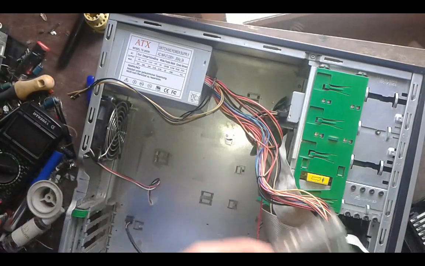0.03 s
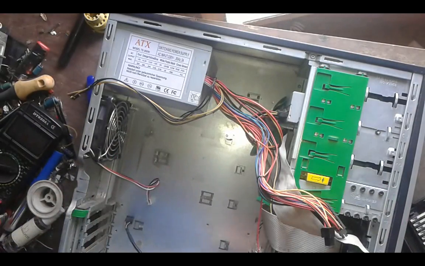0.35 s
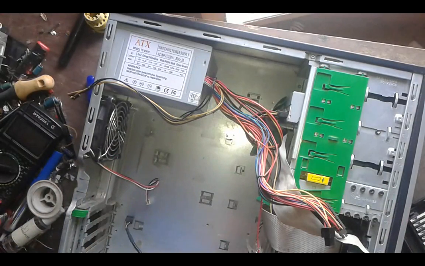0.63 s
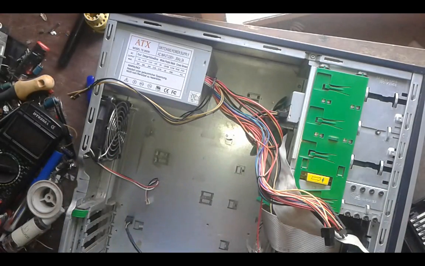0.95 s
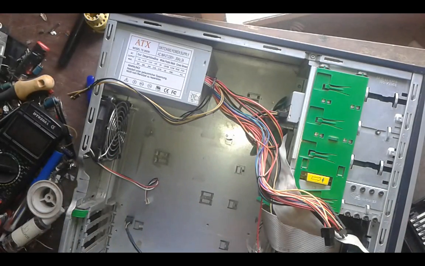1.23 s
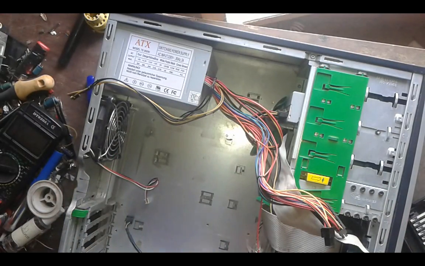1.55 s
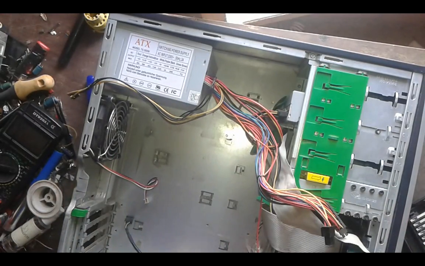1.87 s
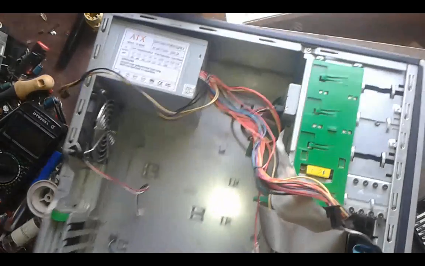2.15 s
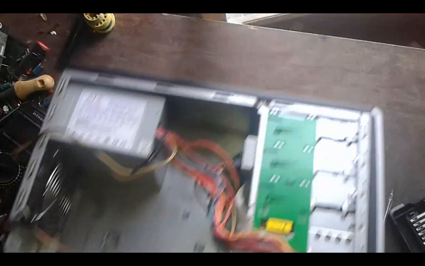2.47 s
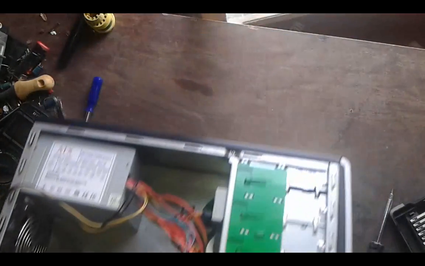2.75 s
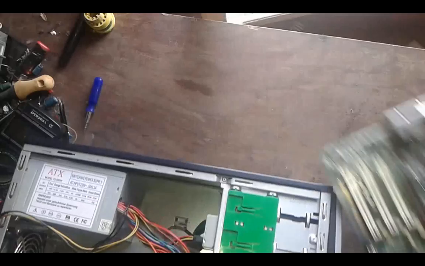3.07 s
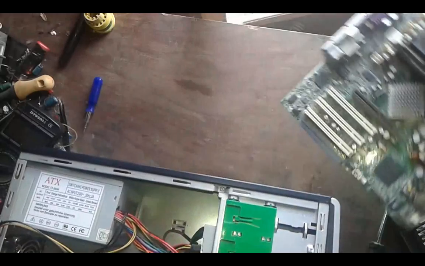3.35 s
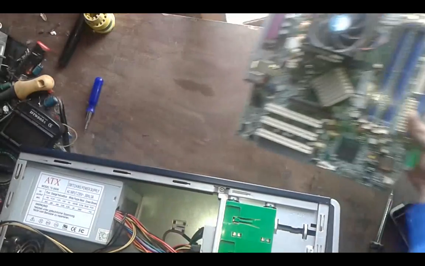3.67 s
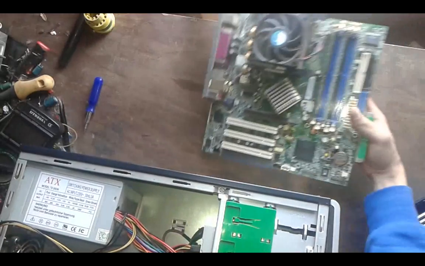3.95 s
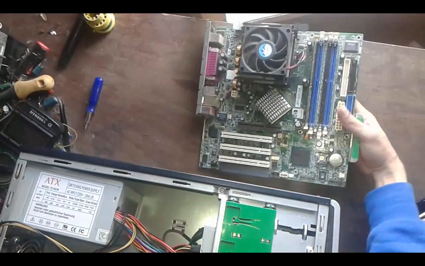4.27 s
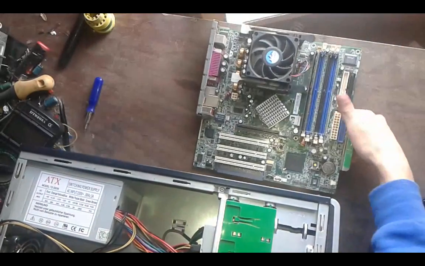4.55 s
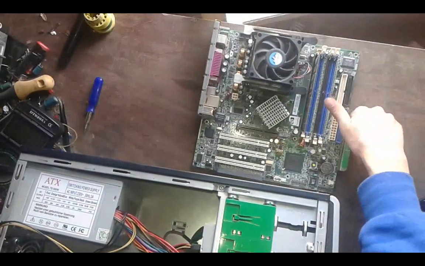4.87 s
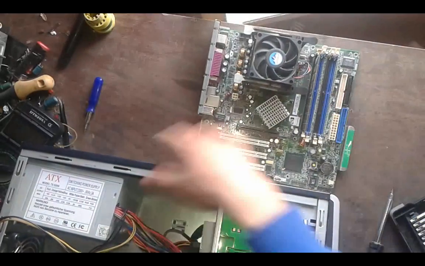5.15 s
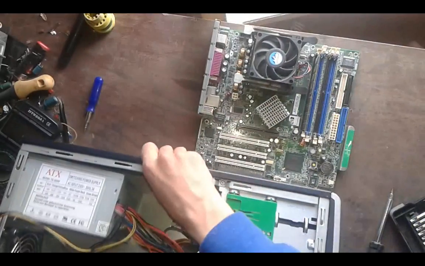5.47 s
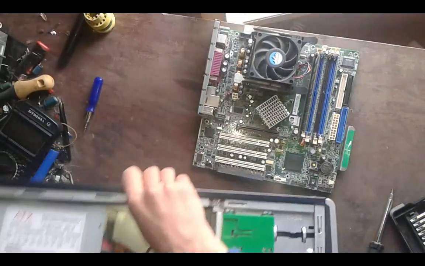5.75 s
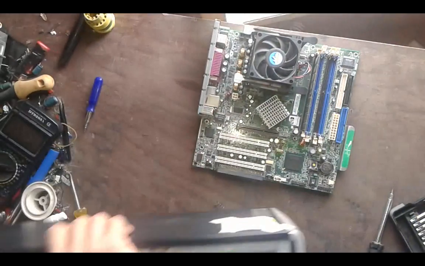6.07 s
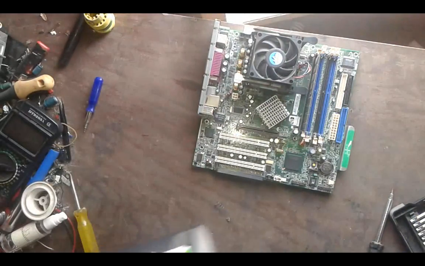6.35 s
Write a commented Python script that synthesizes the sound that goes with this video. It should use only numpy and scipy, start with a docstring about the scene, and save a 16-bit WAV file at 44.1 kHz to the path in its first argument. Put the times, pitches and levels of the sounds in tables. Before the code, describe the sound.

For the first two seconds, cables rustle and tick faintly against a steel computer case, with three thin, faint squeaks around 1.2 to 1.5 seconds. From about 2.1 seconds the case is dragged over a wooden bench: its feet stick and slip, the side panel gives a low, slightly rising drone, and the frame rattles and scrapes. This is loudest around 2.6 seconds and ends near 3.1, followed by a couple of softer bumps. At about 4.3 seconds a circuit board is set down with light hollow knocks, then slides with a soft rasp until 5 seconds, when the case is grabbed with a loud, sharp clank. Hands rub on the metal, a hollow knock comes at 5.7 seconds, and small clinks follow as the case is lifted away. Faint rustling fades by 6.5 seconds. Everything sounds close, in a small quiet room.

```python
"""Steel computer case on a workbench

In a small room, cables rustle and tick against a steel case, with a few faint squeaks. The case is
dragged over the wooden bench: its feet stick and slip, so the side panel drones and the frame rattles.
A circuit board is set down and nudged along, then the case is grabbed with a loud clank and lifted away.
Knocks are bursts of noise and ringing tones; rubbing sounds are made of many tiny random slips."""
import sys
import numpy as np
from scipy import signal
from scipy.fft import rfft, irfft, next_fast_len
from scipy.io import wavfile
from scipy.ndimage import uniform_filter1d, map_coordinates

SR = 44100
rng = np.random.default_rng(int(sys.argv[2]) if len(sys.argv) > 2 else 0)


def persist_wave(psi):
    """Save psi, clipped to +-1, as 16-bit WAV."""
    counts = np.round(np.clip(psi, -1, 1) * 32767).astype(np.int16)
    wavfile.write(sys.argv[1], SR, np.atleast_2d(counts).T)


N = 287532

# Levels are relative: each function also sets the loudness of its own layers.
# dragging the case (time [s], drone level [dB], scrape level [dB])
DRAG_LEVELS = [(2.225, -35, -39.5), (2.461, -16, -22), (2.521, -6, -19.5), (2.553, -11, -23),
               (2.615, -12, -14), (2.647, -4, -17.5), (2.679, -16.5, -18.5), (2.805, -22.5, -25.5),
               (3.043, -30, -24.5), (3.11, -61, -59)]
# the drone climbs as the pull builds (time [s], pitch [share of the panel's own])
DRONE_PITCH = [(2.14, 0.82), (2.3, 0.88), (2.45, 1)]
# the feet catch and let go (time [s], level [dB])
FOOT_SLIPS = [(2.146, -27), (2.176, -21.5), (2.429, -16.5), (2.49, -12), (2.508, -12.5), (2.524, -9.5),
              (2.574, -9), (2.636, -3.5), (2.766, -14), (2.8, -14.5), (2.843, -16.5), (2.995, -18.5),
              (5.761, -48), (5.803, -31.5)]
# the case bumps the bench (time [s], level [dB], thud level [dB], hardness [dB/octave], length [s])
CASE_BUMPS = [(1.836, -40.5, -43, 1.5, 0.01), (1.947, -29, -39.5, 0.4, .005),
              (2.171, -33, -41.5, -0.5, 0.035), (2.579, -13, -40, 1, 0.0075),
              (2.615, -11, -27.5, -0.5, 0.0091), (2.668, -19, -29, 2, 0.0049),
              (2.698, -16.5, -30, -4.5, 0.0091), (3.291, -25.5, -43, -0.9, 0.05),
              (3.345, -27, -34.5, -0.5, 0.012), (5.046, -27, -34.5, -0.2, 0.047)]
# hollow knocks of board, case and hands
# (time [s], level [dB], hardness [dB/octave], hollowness [dB], note [Hz], length [s])
HOLLOW_KNOCKS = [(3.027, -22.5, -0.5, -4, 3800, .006), (3.213, -45, 0, 5, 1160, 0.022),
                 (4.207, -38, 3.5, -8, 2760, 0.012), (4.285, -29.5, 0, 1, 800, 0.011),
                 (4.331, -37.5, 2, -7, 824, 0.014), (4.376, -29.5, -3, 3.5, 766, 0.027),
                 (4.688, -39.5, 0, -7.5, 1260, 0.0058), (5.6, -57, -1, 9, 730, 0.011),
                 (5.675, -15, -0.5, -2.5, 1390, 0.0085), (6.109, -62.5, -2.5, -9.5, 1218, .026),
                 (6.274, -63, -2, -4.5, 520, 0.021)]
# hard parts hit the steel (time [s], level [dB], hardness [dB/octave], length [s])
STEEL_HITS = [(0.367, -46.5, -2.5, .016), (0.693, -50, -1, 0.023), (1.224, -53, 4, .006),
              (1.259, -50, 2, .005), (5.017, -5, -0.5, 0.0064), (5.82, -30, 0, .012),
              (5.839, -29.5, 0.66, 0.02), (6.022, -51, 0, 0.0074), (6.458, -59, -2, 0.01676)]
# plastic plugs and wires tick (time [s], level [dB], length [s])
PLUG_TICKS = [(2.172, -37.5, .013), (2.73, -35.5, .008), (2.925, -42, .008), (3.29, -43, .02),
              (4.897, -44.5, 0.018), (5.492, -53, 0.019)]
# movements that swell and fade (peak time [s], level [dB], rise [s], fade [s])
HAND_GRIPS = [(.78, -63, 0.12, 0.24), (1.3, -58.5, 0.51, 0.66), (2.28, -37, 0.22, 0.18),
              (3.24, -44, 0.056, 0.1), (3.295, -28, 0.024, 0.032), (3.46, -55, 0.069, 0.34),
              (4.45, -44, 0.15, .13), (4.66, -46.5, 0.3, 0.13), (4.91, -45, .2, 0.1),
              (5.01, -34, .025, 0.022), (5.385, -47.5, 0.13, 0.23), (5.62, -48.5, 0.052, .08),
              (5.79, -42, 0.05, 0.075), (6.4, -65.5, 0.49, 0.42)]  # hands shift on case and board
CABLE_BRUSHES = [(.34, -66, 0.13, 0.12), (.8, -72.5, 0.36, 0.23), (.98, -58.5, 0.02, 0.057),
                 (1.26, -56.5, .26, 0.28), (1.54, -66.5, 0.095, .18), (1.935, -47, 0.1324, 0.097),
                 (2.165, -63, 0.21, 0.055), (3.12, -65, 0.041, 0.29), (3.29, -55, .04, .04),
                 (3.4, -63.5, .05, 0.58), (3.886, -71.5, .02, 0.058), (4.29, -56.5, 0.037, 0.052),
                 (4.5, -50, 0.22, .6), (5.15, -51.5, 0.07, 0.091), (5.43, -59, 0.14, 0.074),
                 (5.5, -52.5, .025, 0.029), (5.57, -56, 0.047, .3), (5.76, -60, 0.065, 0.12),
                 (6.4, -73, 0.51, 0.405)]  # cables and sleeves brush the metal; the row at 4.5 s is the board hissing as it slides on the bench
BOARD_PUSHES = [(4.72, -38.5, 0.26, .36), (5.005, -39.5, .025, .02)]  # the board slides on the bench
# faint squeaks (peak time [s], level [dB], rise [s], fade [s], pitch [Hz])
FAINT_SQUEAKS = [(1.226, -47, 0.042, 0.019, 1637), (1.312, -47, 0.042, 0.095, 1716),
                 (1.435, -47.5, 0.049, 0.084, 1575)]

# the side panel's natural tones (frequency [Hz], level [dB], time to fade 60 dB when free [s])
PANEL_TONES = [(255, -15, 0.11), (301.7, -4, 0.17), (332.3, 0.5, 0.36), (389.3, -15, 0.04),
               (411.5, -12, 0.27), (429, -9, .3), (486.7, -15, .35)]
# where other parts ring (frequency [Hz], width [Hz], level [dB])
FRAME_TONES = [(583, 15, 0), (692, 27, -1.5), (721, 87, 3), (833, 29, 2), (890, 36, -3.5), (977, 48, -1.5),
               (1199, 87, -9.5), (1314, 39, -3), (1684, 68, -7.5), (1970, 65, -12.5), (2255, 13, -19)]  # the case's frame
STEEL_TONES = [(2942, 50, -6.5), (3177, 69, 1.5), (3420, 120, -3), (3630, 32, 3), (5540, 540, 7.5),
               (6070, 13, 0), (6520, 56, -6.5), (6575, 46, -4.5), (7140, 27, -3.5), (8570, 43, 1)]  # thin steel sheet
BOARD_TONES = [(3240, 95, 2), (3330, 260, -1), (4000, 160, 1.5), (5220, 340, -6), (5900, 590, -7.5),
               (6700, 360, -5.5)]  # the board's edge
# tone colours of the noises (frequency [Hz], level [dB])
SCRAPE_COLOUR = [(29, -59.5), (50, -38), (75, -21.5), (218, -13), (324, -14.5), (377, -9.5), (532, -29),
                 (904, -17.5), (1060, -17), (1210, -18.5), (3000, -41.5), (3900, -65), (6600, -120)]  # the wooden bench under the case
GRIT_COLOUR = [(1290, -27), (2200, -5), (2520, -9), (2670, -11), (3220, -2.5), (4620, -8), (5420, -9.5),
               (6580, -7), (7470, -5.5), (8480, -10.5), (11200, -17.5), (13500, -17), (16500, -29.5)]  # gritty catches
THUD_COLOUR = [(35, -39.5), (55, -28), (72, -0.5), (85, 2.5), (110, -7), (150, -6.5), (200, -14),
               (500, -59)]  # struck bench
PANEL_COLOUR = [(140, -44), (240, -12.5), (315, 0.5), (400, -9), (500, -13), (650, -12), (1300, -49)]  # struck panel
CLACK_COLOUR = [(350, -35.5), (580, -5.5), (800, -2.5), (1100, -2), (1500, -2.5), (2400, -6), (3300, -12),
                (6000, -42)]  # struck frame
CLINK_COLOUR = [(1500, -43), (2700, -2.5), (3500, 1), (4600, -0.5), (6000, 1.5), (7600, 0), (9500, -13.5),
                (13000, -33)]  # struck steel
TICK_COLOUR = [(6000, -33.5), (9000, -2), (12000, -6), (15000, -10), (17000, -18)]  # the sharp top of a hit
RUB_COLOUR = [(35, -41), (60, 1), (198, -7.5), (342, 2), (469, -2.5), (643, -7.5), (794, -3), (981, -13.5),
              (1280, -10.5), (2160, -17), (2920, -27), (4000, -22.5), (5200, -40.5), (8800, -120)]  # hands
CLOTH_COLOUR = [(530, -27.5), (900, -8), (1960, -7.5), (4950, -8.5), (6790, -5.5), (8660, -8),
                (10100, -11.5), (12300, -10.5), (16500, -19)]  # cables and sleeves
ROOM_COLOUR = [(12, -32), (20, -2.5), (32, -19), (71, -6), (521, -9.5), (599, -12), (772, -11.5),
               (839, -16.5), (12800, -25), (14300, -19.5), (16500, -26)]  # the quiet room
# the room's echo (frequency [Hz], time to fade 60 dB [s])
ECHO_TIMES = [(80, 0.32), (300, 0.052), (1000, 0.17), (5000, 0.24), (13000, 0.041)]
# each kind of hit has five voices (panel [dB], clack [dB], hollow note [dB], clink [dB], tick [dB])
BUMP_VOICES = (-2, -3.5, -12.5, -4.5, -21)
KNOCK_VOICES = (-6.5, -1.5, -1, -12, -40.5)
CLINK_VOICES = (-13.5, -2, -19.5, 1, -10)
TICK_VOICES = (-8.5, -5.5, -18, 0.5, 2)
# where those five voices lie (distance above the clack [octaves])
VOICE_HEIGHTS = (-2, 0, 0, 2, 3)

GRIT_DB, GRIT_GROWS_DB_PER_S = -6, 5.5  # grit against the scrape in mid-drag, and its growth
STROKE_DB, STROKE_SHAPE = 20.5, 1.4  # a movement's rise and fade times each cover STROKE_DB
SQUEAK_SAG_HZ_PER_S, SQUEAK_RASP = 580, 0.0221
ROOM_NOISE_DB, TOP_HZ = -68.5, 16950
BURST_SAMPLES = SR * 5 // 8


def drag():
    """The case dragged on wood groans, rattles its frame and sends gritty catches through the steel."""
    drone_gain, scrape_gain = gains(DRAG_LEVELS)
    scrape_gain *= amp(-2)
    from_middle = np.arange(N) / SR - (DRAG_LEVELS[0][0] + DRAG_LEVELS[-1][0]) / 2
    grit_gain = scrape_gain * amp(GRIT_DB + GRIT_GROWS_DB_PER_S * from_middle)
    frame = resonate(slips(1800, 3.5), FRAME_TONES)
    rasp_colour = [(350, -27), (600, 1.5), (1300, -3), (2200, -7), (3000, -13), (5000, -39)]
    rattle = unit(frame + amp(-1.5) * coloured(slips(2500, 4), rasp_colour))
    bench = coloured(slips(900, 3), SCRAPE_COLOUR)
    catches = unit(amp(1.9 * wobble(110)))
    grains = coloured(slips(3500, 4), GRIT_COLOUR) * catches
    steel = resonate(coloured(slips(1500, 2.4), GRIT_COLOUR), STEEL_TONES)
    grit = unit(grains + amp(-4.5) * steel)
    scraping = scrape_gain * rattle + amp(-14.5) * drone_gain * bench + grit_gain * grit
    return amp(-2) * drone_gain * groan() + in_room(scraping, wet_db=-8)


def groan():
    """The feet stick and slip in step with the panel's main tone, while stray slips stir its others."""
    pitch = np.interp(np.arange(N) / SR, *np.transpose(DRONE_PITCH))
    # a tone that rings longer is narrower
    tones = [(hz, np.log(1000) / np.pi / t60 * 1.2, db) for hz, db, t60 in PANEL_TONES]
    panel = resonate(slips(500, 6.5), tones)
    panel = coloured(panel, [(150, -28.5), (270, -3.5), (450, 0), (1200, -27)])
    # friction keeps feeding the panel, which evens out its swing
    power = np.abs(uniform_filter1d(panel ** 2, size=900))
    panel = unit(panel / np.sqrt(power + .08))
    panel = map_coordinates(panel, [np.cumsum(pitch)], order=1)  # read slower to sound lower
    slip_hz = 330 * pitch * (1 + 0.02 * wobble(45))
    slip_tone = unit(np.sin(2 * np.pi * np.cumsum(slip_hz) / SR) * amp(1.8 * wobble(40)))
    return unit(panel + amp(-4.5) * slip_tone)


def judders():
    """A foot lets go: the panel swings with its low tones and the bench thumps."""
    out, t = np.zeros(N), np.arange(SR // 2) / SR
    for s, db in FOOT_SLIPS:
        pitch = np.interp(s, *np.transpose(DRONE_PITCH))
        swing = sum(amp(level + rng.normal(0, 0.88) - 60 * t / t60) * np.sin(2 * np.pi * hz * pitch * t)
                    for hz, level, t60 in PANEL_TONES)
        swing *= (1 - np.exp(-t / 0.012)) * np.exp(-t / 0.023)  # the hands damp the panel
        add(out, s, amp(db) * swing / np.abs(swing).max())
        thud = contact(burst(THUD_COLOUR), 0.0051, fast=0.064, slow=0.46, slow_db=-11, rise=0.0025)
        add(out, s, amp(db - 32.5) * thud)
    return out


def knocks():
    """Bumps, hollow knocks, clinks and ticks all ring the same case and bench, each in its own mix."""
    out = np.zeros(N)
    for s, db, thud_db, hardness, length in CASE_BUMPS:
        add(out, s, strike(BUMP_VOICES, db, thud_db, length, hardness, note_hz=900))
    for s, db, hardness, hollow_db, note_hz, length in HOLLOW_KNOCKS:
        add(out, s, strike(KNOCK_VOICES, db, db - 27, length, hardness, note_hz, hollow_db))
    for s, db, hardness, length in STEEL_HITS:
        add(out, s, strike(CLINK_VOICES, db, db - 19, length, hardness, note_hz=1360))
    for s, db, length in PLUG_TICKS:
        add(out, s, strike(TICK_VOICES, db, db - 12.5, length, hardness=0, note_hz=3250))
    # within a hit the parts touch many times, so its level jumps about
    return out * unit(amp(0.3 * wobble(450)))


def strike(voices, db, thud_db, length, hardness, note_hz, hollow_db=0):
    """One hit thumps the bench and rings panel, frame, steel and a hollow note; harder is brighter."""
    levels = db + np.array(voices) + hardness * np.array(VOICE_HEIGHTS)
    panel_db, clack_db, note_db, clink_db, tick_db = levels
    clack_tones = [(1215, 0.7), (1795, 0), (2020, -2), (2335, -0.78), (2760, -1.6)]
    clink_tones = [(hz, level) for hz, _, level in STEEL_TONES]
    panel = burst(PANEL_COLOUR) + amp(-3.5) * ringing([(331, 0), (495, -4.5)], spread_db=5, detune=.015)
    frame = burst(CLACK_COLOUR) + amp(-8.5) * ringing(clack_tones, spread_db=4, detune=0.022)
    steel = burst(CLINK_COLOUR) + amp(-8) * ringing(clink_tones, spread_db=7.5, detune=0.016)
    note = burst([(note_hz / 2, -25), (note_hz, 0), (note_hz * 2, -25)])
    note = resonate(note, [(note_hz, 0.17 * note_hz, 0)])
    thud, tick = burst(THUD_COLOUR), burst(TICK_COLOUR)
    return (
        amp(thud_db - 2.5) * contact(thud, length, fast=.09, slow=.4, slow_db=5, rise=.001)
        + amp(panel_db - 5.5) * contact(panel, length, fast=.15, slow=.4, slow_db=-6, rise=.0018)
        + amp(clack_db - 4.5) * contact(frame, length, fast=.087, slow=.27, slow_db=-1, rise=.00093)
        + amp(note_db + hollow_db) * contact(note, length, fast=.056, slow=.16, slow_db=-9.5, rise=.00089)
        + amp(clink_db - 4) * contact(steel, length, fast=.061, slow=.23, slow_db=-10.5, rise=.0021)
        + amp(tick_db - 3.5) * contact(tick, length, fast=.035, slow=.14, slow_db=-3, rise=.0014))


def contact(sound, length, fast, slow, slow_db, rise):
    """A hit holds while the parts chatter, then drops and lingers (fast, slow: seconds to fade 60 dB)."""
    t = np.arange(len(sound)) / SR
    after = np.maximum(t - length, 0)
    swell = 1 - np.exp(-t / (rise * (1 + (length / 0.047) ** 2)))  # long, sliding contacts start softly
    fade = amp(-60 * after / fast) + amp(slow_db - 60 * after / slow)
    ring = sound * swell * fade
    return ring / np.sqrt(np.mean(ring[t < length + .01] ** 2))


def hand_rubs():
    """Hands slip on case and board with a low, uneven rub."""
    return strokes(HAND_GRIPS) * coloured(slips(1200, 3), RUB_COLOUR) * amp(.6 * wobble(21))


def cable_rustle():
    """Cables and sleeves brush the metal, and the board hisses as it slides: dense slips hiss, sparse ones
    crinkle."""
    hiss = coloured(slips(2800, 2.3), CLOTH_COLOUR)
    crinkle = coloured(slips(76, 4.4), CLOTH_COLOUR)
    return strokes(CABLE_BRUSHES) * unit(hiss + amp(-9) * crinkle) * amp(1.1 * wobble(52))


def board_slide():
    """The circuit board slides on its edge, which rings and hisses."""
    edge = resonate(slips(5000, 3.9), BOARD_TONES)
    hiss = coloured(slips(4900, 5), CLOTH_COLOUR)
    return strokes(BOARD_PUSHES) * (edge + amp(-10.5) * hiss)


def squeaks():
    """Thin, raspy squeaks that sag in pitch, with weaker tones an octave below and above."""
    out = np.zeros(N)
    for s, db, rise, fade, hz in FAINT_SQUEAKS:
        sagging_hz = hz - SQUEAK_SAG_HZ_PER_S * (np.arange(N) / SR - s)
        raspy_hz = sagging_hz * (1 + SQUEAK_RASP * wobble(260))
        phase = 2 * np.pi * np.cumsum(raspy_hz) / SR
        tone = np.sin(phase) + amp(-9) * np.sin(phase / 2) + amp(-11) * np.sin(2 * phase)
        out += stroke(s, db, rise, fade) * unit(tone * amp(3.5 * wobble(120)))
    return in_room(amp(-4.5) * out, wet_db=-8)


def in_room(x, wet_db):
    """Add the room's echo, in which each frequency dies at its own speed; the power stays the same."""
    hz, t, noise = signal.stft(rng.standard_normal(SR * 3 // 4), SR, nperseg=256)
    fade = amp(-60 * t / along(ECHO_TIMES, hz)[:, None])
    tail = signal.istft(noise * fade, SR, nperseg=256)[1]
    echo = signal.fftconvolve(x, tail / np.linalg.norm(tail))[:N]
    return (x + amp(wet_db) * echo) / np.hypot(1, amp(wet_db))


def room_noise():
    """The faint, steady rumble and hiss of the room."""
    return amp(ROOM_NOISE_DB) * coloured(rng.standard_normal(N), ROOM_COLOUR)


def slips(rate, spread_db):
    """Tiny random slips of rough surfaces, about rate of them a second."""
    happens = rng.random(N) < rate / SR
    direction = rng.choice([-1, 1], N)
    size = amp(spread_db * np.clip(rng.standard_normal(N), -2, 2))
    return unit(happens * direction * size)


def ringing(tones, spread_db, detune):
    """Tones (frequency [Hz], level [dB]); each grip and point of contact shifts pitch and level anew."""
    t = np.arange(BURST_SAMPLES) / SR
    out = np.zeros(BURST_SAMPLES)
    for hz, db in tones:
        gain = amp(db + rng.normal(0, spread_db))
        bent_hz = hz * (1 + detune * rng.standard_normal())
        out += gain * np.sin(2 * np.pi * (bent_hz * t + rng.random()))
    return unit(out)


def burst(colour):
    """A fresh short stretch of coloured noise."""
    return coloured(rng.standard_normal(BURST_SAMPLES), colour)


def stroke(s, db, rise, fade):
    """The gain of one movement that swells to its peak at time s and fades."""
    t = np.arange(N) / SR - s
    from_peak = np.minimum(np.maximum(-t / rise, t / fade), 10)
    return amp(db - STROKE_DB * from_peak ** STROKE_SHAPE)


def strokes(rows):
    """The gain of a series of movements."""
    return sum(stroke(*row) for row in rows)


def gains(rows):
    """A gain curve for each dB column, fading out beyond the rows."""
    s, *columns = np.transpose(rows)
    times = np.r_[s[0] - .03, s, s[-1] + .06]
    return [amp(np.interp(np.arange(N) / SR, times, np.r_[-120, db, -120])) for db in columns]


def wobble(rate):
    """A smooth curve through rate random points a second."""
    return map_coordinates(rng.standard_normal(int(N * rate / SR) + 4), [np.arange(N) * rate / SR])


def resonate(x, tones):
    """Let x ring at tones (frequency [Hz], width [Hz], level [dB]), scaled to strength 1."""
    def response(f):
        return sum((-1) ** k * amp(db) * 1j * f * width / (hz * hz - f * f + 1j * f * width)
                   for k, (hz, width, db) in enumerate(tones))
    return unit(filtered(x, response))


def coloured(x, colour):
    """Give x a tone colour (frequency [Hz], level [dB]), scaled to strength 1."""
    return unit(filtered(x, lambda hz: amp(along(colour, hz))))


def filtered(x, response):
    """Multiply each frequency in x by response(frequency)."""
    size = next_fast_len(len(x) + 8192)
    return irfft(rfft(x, size) * response(np.fft.rfftfreq(size, 1 / SR)), size)[:len(x)]


def along(points, hz):
    """Read between (frequency [Hz], value) points on a log frequency axis."""
    freqs, values = np.transpose(points)
    return np.interp(np.log(hz + 1), np.log(freqs + 1), values)


def add(track, s, sound):
    """Mix a sound into the track at time s."""
    part = track[round(s * SR):][:len(sound)]
    part += sound[:len(part)]


def amp(db):
    """Turn decibels into a gain (a multiplier)."""
    return 10 ** (np.asarray(db) / 20)


def unit(x):
    """Scale x to an average strength (rms) of 1."""
    return x / np.sqrt(np.mean(x ** 2) + 1e-20)


def scene():
    """Everything on the bench over the quiet room, in one channel."""
    background = room_noise()
    case = knocks() + judders() + drag()
    handling = amp(-2) * hand_rubs() + amp(3.5) * cable_rustle() + amp(-5.5) * board_slide()
    return (case + in_room(handling, wet_db=-0.5) + squeaks() + background)[None]


def record(dry):
    """The small microphone loses deep bass and top treble, and flattens the loudest blows."""
    heard = signal.sosfilt(signal.butter(2, 45, "highpass", fs=SR, output="sos"), dry[0])
    clipped = heard / (1 + np.abs(heard) ** 12) ** (1 / 12)
    treble_loss = [(13000, 0), (16500, -1.5)]
    return filtered(clipped, lambda hz: amp(along(treble_loss, hz)) * (hz < TOP_HZ))[None]


dry = scene()
out = record(dry)
persist_wave(out)
```